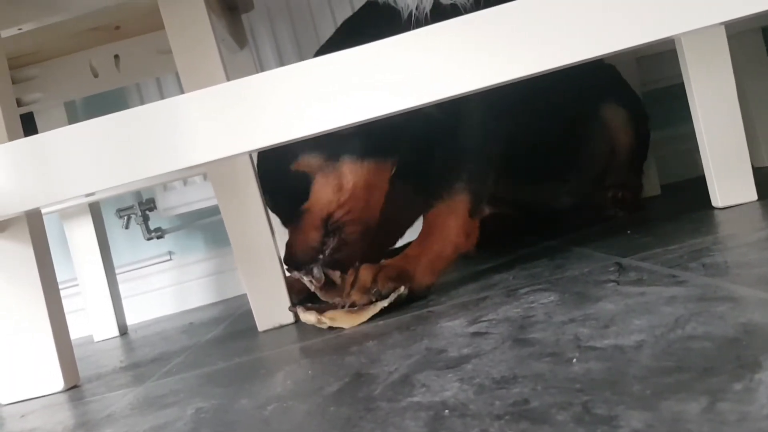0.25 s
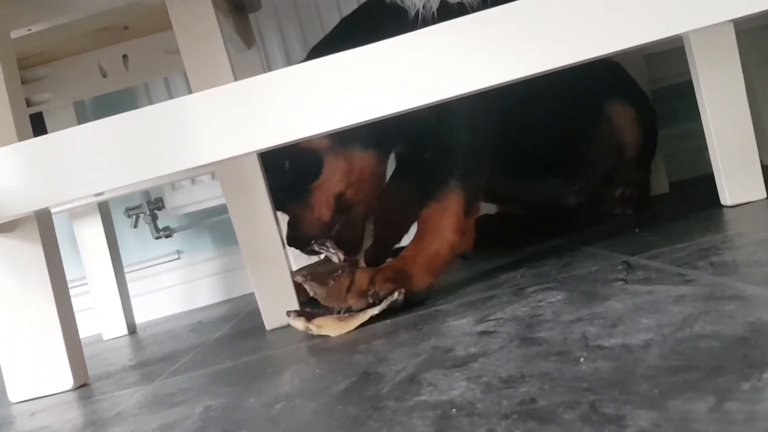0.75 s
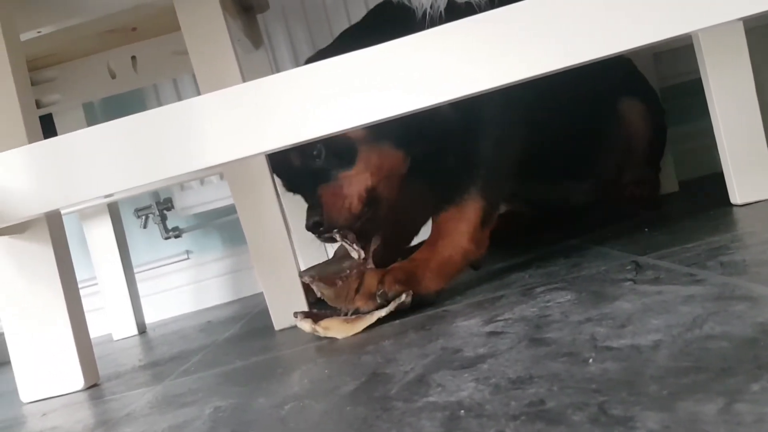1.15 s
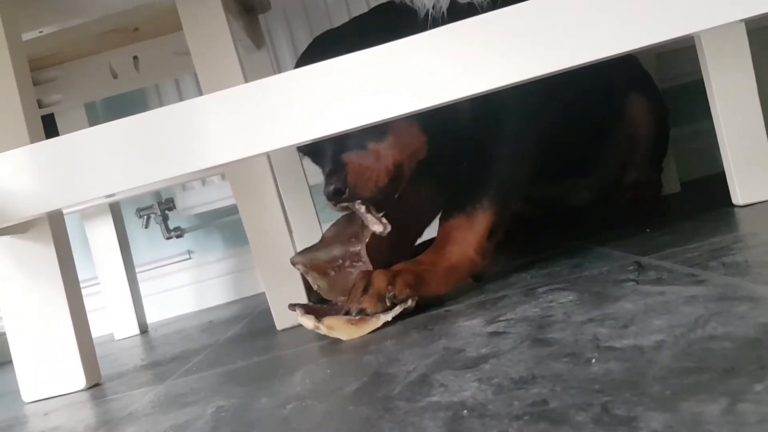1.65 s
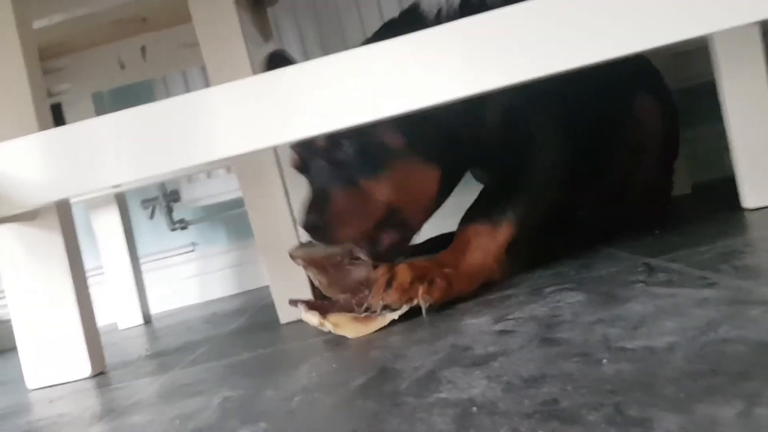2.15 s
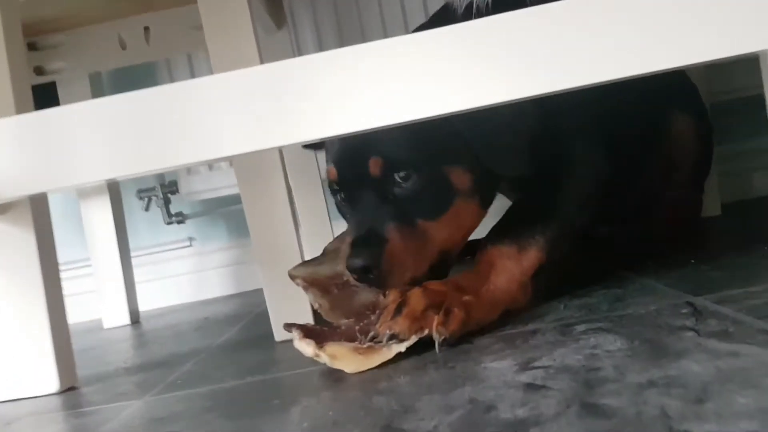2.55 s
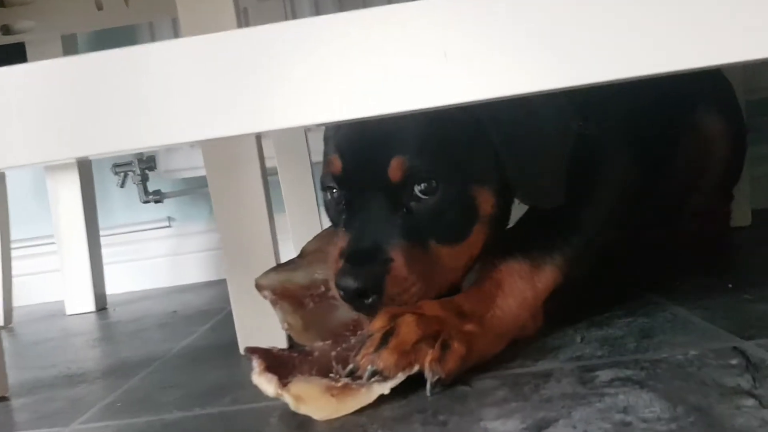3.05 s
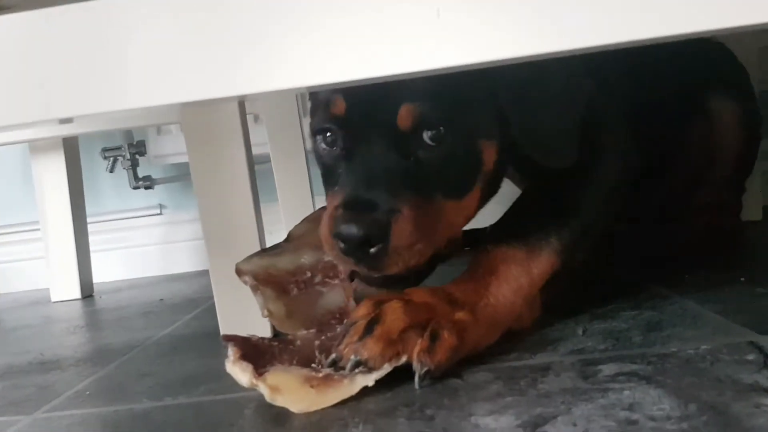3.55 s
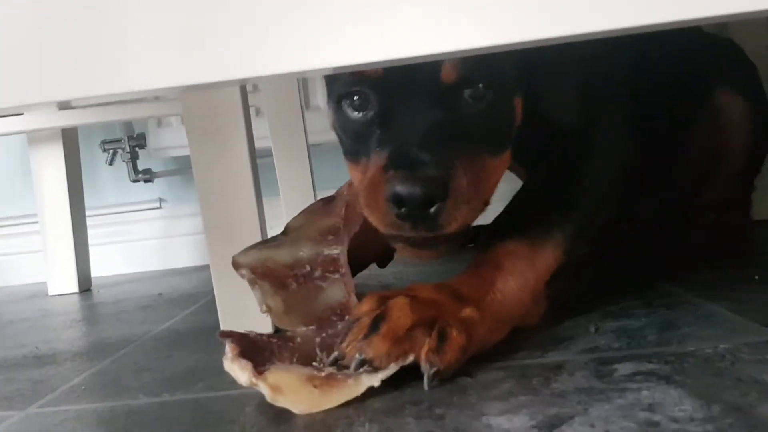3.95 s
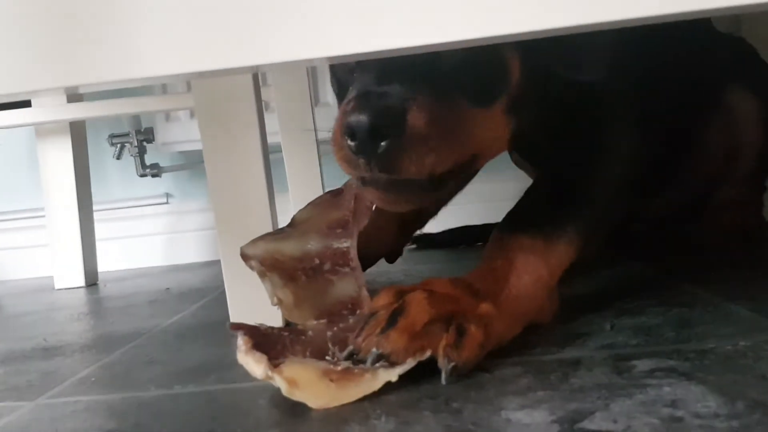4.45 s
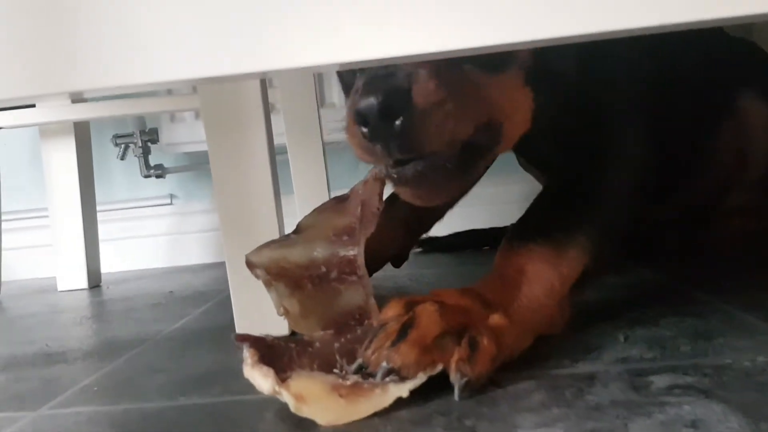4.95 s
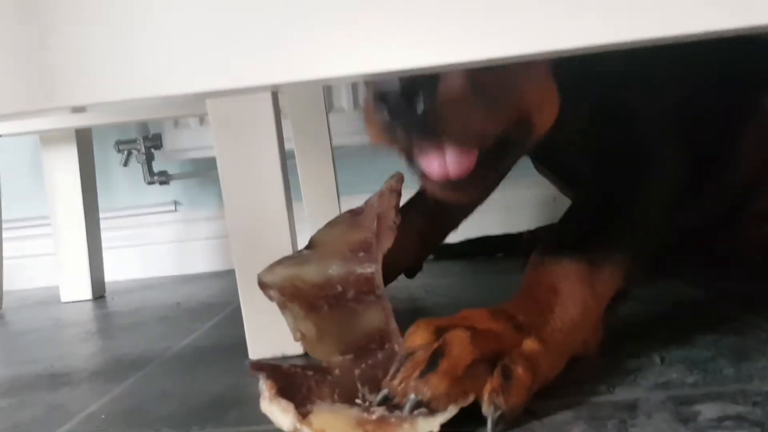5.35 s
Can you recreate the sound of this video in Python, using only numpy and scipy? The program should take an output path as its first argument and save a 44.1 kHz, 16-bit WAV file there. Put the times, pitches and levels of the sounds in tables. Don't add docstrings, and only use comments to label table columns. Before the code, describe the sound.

Close stereo handheld capture of a puppy chewing in a small tiled kitchen. Bone cracks and hollow knocks dominate the first half, with low handling bumps and thin nostril whistles around two seconds. The second half is wetter: tongue pops, tiny bright saliva snaps, breathy hissing sniffs, and a final strong smack. Quiet room hush and short reflections surround it.

```python
import sys
import numpy as np
from scipy import signal
from scipy.fft import rfft, irfft, next_fast_len
from scipy.io import wavfile
from scipy.ndimage import uniform_filter1d

SR = 44100
rng = np.random.default_rng(int(sys.argv[2]) if len(sys.argv) > 2 else 0)


def bounce(signal):
    frames = np.transpose(np.atleast_2d(signal))
    limited = np.clip(frames, -1, 1)
    pcm = np.round(limited * 32767).astype(np.int16)
    wavfile.write(sys.argv[1], SR, pcm)


def how_loud(loudness_db):
    steps = np.asarray(loudness_db, float) / 20
    return 10 ** steps


N = 247386


def band(x, hz, width):
    return signal.lfilter(*signal.iirpeak(min(hz, .45 * SR), hz / min(width, .45 * SR), SR), x)


def peaks(x, table):
    return sum((-1) ** k * how_loud(db) * band(x, hz, w) for k, (hz, w, db) in enumerate(table))


def shape(x, table):
    hz, db = np.transpose(table)
    size = next_fast_len(x.shape[-1])
    f = np.fft.rfftfreq(size, 1 / SR) + 1
    gain = how_loud(np.interp(np.log(f), np.log(hz), db))
    return irfft(rfft(x, size) * gain, size)[..., :x.shape[-1]]


def curve(table):
    s, *columns = np.transpose(table)
    return [np.interp(np.arange(N) / SR, s, c) for c in columns]


def walk(rate):
    hold = int(SR / rate)
    levels = np.repeat(rng.standard_normal(N // hold + 1), hold)
    return 1.48 * uniform_filter1d(levels, hold)[:N]


def swells(peak_s, fade_s, rise_share, *weights):
    t = np.linspace(0, N / SR, num=N // 128)
    fade_s = np.maximum(fade_s, .005) + 0 * peak_s
    late = (t - peak_s[:, None]) / fade_s[:, None]
    gate = np.exp(np.minimum(-late, late / rise_share))
    return [np.interp(np.arange(N) / SR, t, w @ gate) for w in weights]


def unit(x):
    return x / np.sqrt(np.mean(x ** 2))


def peak_at(x, db):
    return x * how_loud(db) / np.abs(x).max()


def add(out, s, x):
    i = int(s * SR)
    out[..., i:i + x.shape[-1]] += x[..., :N - i]


def aim(pan_db):
    return how_loud(np.outer([1, -1], pan_db) / 2)


def burst(length, grit_db, rise=0.0012):
    t = np.arange(4096) / SR
    grains = rng.standard_normal(4096) * how_loud(grit_db * rng.standard_normal(4096))
    return grains * np.exp(-t / max(length, .0002)) * np.minimum(t / rise, 1)


def air():
    # f/Hz, level/dB
    hush_colour = [(25, -48), (50, -9), (90, 0), (150, -14.5), (250, -14), (400, -18.5), (600, -24.5),
                   (1000, -23), (1600, -27.5), (3500, -33), (5500, -36.5), (8000, -32), (12000, -27.5),
                   (15000, -25)]
    # f/Hz, level/dB
    fridge_lines = [(97, -79.5), (689, -87.5), (1184, -86)]
    mid, side = rng.standard_normal((2, N))
    side = shape(side, [(60, 7), (200, -7), (700, 1.5), (2000, 1.0)])
    out = how_loud(-65.5) * unit(shape(mid + side * np.array([[1], [-1]]), hush_colour))
    for hz, db in fridge_lines:
        line = unit(band(rng.standard_normal(N), hz, 4 + .012 * hz))
        out = out + how_loud(db) * aim(-5) * line
    return out


def rumble():
    # t/s of the peak, level/dB
    bump_list = [(.2, -65), (.6, -56), (1.29, -59), (1.8, -43), (1.9, -44), (2.05, -53), (2.19, -37.5),
                 (2.37, -64.5), (2.73, -55), (2.95, -55), (3.08, -51.5), (3.35, -58), (3.48, -49.5),
                 (3.69, -59), (3.8, -55), (4.0, -48.5), (4.14, -54), (4.28, -61), (4.88, -61), (5.01, -53),
                 (5.12, -48), (5.28, -51), (5.42, -45), (5.6, -68)]
    # t/s of the peak, fade/s, level/dB
    shuffle_list = [(.74, 0.06, -62), (1.75, 0.15, -65), (2.17, 0.18, -61), (2.6, 0.061, -67.5),
                    (3.3, 0.26, -79), (4.4, 0.38, -77), (4.6, 0.033, -67), (5.0, 0.069, -63.5)]
    # t/s, level/dB
    hand_pan = [(0, -5), (.55, 0), (2.4, 0), (3.2, -6), (4.2, -8), (4.8, -13), (5.6, -10)]
    x = rng.standard_normal((2, N)) * how_loud(2 * walk(22.05))
    x = x[0] + .3 * x[1] * np.array([[1], [-1]])
    bumps = shape(x, [(25, -48), (48, -4.5), (72, -4.5), (100, -8.5), (160, -23.5), (400, -55)])
    scuffed = x * how_loud(2.7 * walk(45))
    shuffle = shape(scuffed, [(100, -36), (170, -2.0), (350, -2.5), (700, -9.0), (1500, -25)])
    bump_s, bump_db = np.transpose(bump_list)
    paw_s, paw_fade_s, paw_db = np.transpose(shuffle_list)
    still_hand_db, still_paws_db = -69.5, -84
    hand = swells(bump_s, 0.038, 0.63, how_loud(bump_db - 3.0))[0] + how_loud(still_hand_db)
    paws = swells(paw_s, paw_fade_s, 0.86, how_loud(paw_db))[0] + how_loud(still_paws_db)
    return unit(bumps) * hand * aim(curve(hand_pan)[0]) + unit(shuffle) * paws * aim(-4)


def whistles():
    # level/dB, its pitch as (t/s, f/Hz) points
    whistle_list = [
        (-77, [(1.995, 10850), (2.03, 11300), (2.052, 12000), (2.085, 11720), (2.13, 11900), (2.15, 11800), (2.225, 11200)]),
        (-76, [(2.225, 11200), (2.25, 11400), (2.29, 11500), (2.335, 11900), (2.37, 12000), (2.435, 10600)]),
        (-74.5, [(2.083, 10500), (2.11, 10620), (2.155, 10480), (2.195, 10100)]),
        (-76, [(2.243, 10000), (2.34, 10000)]),
    ]
    out, t = 0, np.arange(N) / SR
    for db, pitch in whistle_list:
        on = uniform_filter1d(1. * (t > pitch[0][0]) * (t < pitch[-1][0]), size=900)
        level = how_loud(db + 5 + 2 * walk(60))
        hz = curve(pitch)[0] + 20 * walk(90)
        out = out + on * level * np.sin(2 * np.pi * np.cumsum(hz) / SR)
    return out


def puffs():
    # t/s, length/s, f/Hz, width/Hz, level/dB
    puff_list = [(0.735, 0.26, 4100, 450, -71.5), (1.266, 0.076, 4400, 1400, -76.5),
                 (1.269, .06, 6470, 900, -79), (1.508, 0.28, 6800, 300, -83),
                 (3.294, 0.072, 2600, 300, -68), (3.296, .1, 1600, 300, -69),
                 (4.089, 0.049, 1880, 404, -67), (4.83, 0.17, 2150, 250, -70)]
    out, flutter = np.zeros(N), how_loud(2 * walk(46))
    t = np.arange(SR // 3) / SR
    for s, length, hz, width, db in puff_list:
        x = unit(band(band(rng.standard_normal(len(t)), hz, width), hz, width))
        add(out, s, how_loud(db) * x * np.sin(np.pi * np.clip(t / length, 0, 1) ** 0.43))
    return out * flutter


def nose():
    # t/s of the peak, fade/s, hiss level/dB, centre f/Hz,
    # wet top hiss level/dB
    sniff_list = [(0.02, .06, -76, 5930, -67), (.46, 0.12, -68.5, 4400, -65), (.553, 0.03, -80, 3990, -39),
                  (.72, 0.064, -63.5, 3230, -73), (1.66, 0.041, -73, 5630, -68),
                  (1.84, .05, -73, 3410, -90), (1.98, .05, -84, 5900, -64.5), (2.15, 0.11, -64, 4900, -55),
                  (2.39, 0.065, -71, 4500, -65.5), (2.58, 0.023, -73, 5300, -71),
                  (2.86, 0.038, -70, 3460, -76), (2.99, 0.067, -67.5, 4300, -61),
                  (3.29, 0.037, -85, 3930, -77), (3.51, 0.34, -78, 5540, -64.5),
                  (4.12, 0.028, -87, 5000, -58), (4.27, 0.12, -66, 3880, -57),
                  (4.66, 0.16, -74.5, 5500, -64), (4.78, 0.06, -75, 6080, -55),
                  (5.12, 0.082, -54.5, 5070, -57.5), (5.3, 0.16, -62.5, 5640, -63),
                  (5.42, 0.19, -61.5, 3260, -55.5)]
    quiet_nose_db, quiet_wet_db = -84.5, -81.5
    s, fade, hiss_db, centre_hz, wet_db = np.transpose(sniff_list)
    weights = how_loud(hiss_db), how_loud(hiss_db) * centre_hz, how_loud(wet_db)
    flow, pitch, damp = swells(s, fade, 0.57, *weights)
    centre, hiss = pitch / flow, 0
    for hz in (1800, 2840, 3350, 4400, 5720, 6800, 6800):
        near = np.exp(-(np.log(hz / centre) / 0.22) ** 2)
        breath = unit(band(rng.standard_normal(N), hz, 0.77 * hz))
        hiss = hiss + (1.05 + near) * how_loud(2 * walk(27)) * breath
    spray = rng.standard_normal(N) * how_loud(1.4 * rng.standard_normal(N))
    wet = unit(band(band(spray, 13800, 7400), 14500, 10000))
    dry_part = (flow + how_loud(quiet_nose_db)) * how_loud(-14.5) * hiss
    return dry_part + (damp + how_loud(quiet_wet_db)) * how_loud(-10.5 + 2 * walk(30)) * wet


def snaps():
    # t/s, level/dB, centre f/Hz
    snap_list = [(0.3594, -60, 12300), (1.9622, -44.5, 7200), (2.1334, -38, 10100), (2.535, -48, 10800),
                 (4.271, -43, 12000), (4.4574, -36, 11000), (4.635, -39.5, 12900), (4.7203, -29, 12800),
                 (4.7426, -31, 13500), (4.782, -31.5, 13000), (4.8, -35, 9950), (4.819, -37, 9500),
                 (4.894, -37, 8850), (4.906, -42, 15000)]
    out = np.zeros(N)
    for s, db, hz in snap_list:
        click = burst(0.0017, 2.7, rise=0.001)
        add(out, s, peak_at(band(band(click, hz, .5 * hz), hz, .7 * hz), db - 5.5))
    return out


def ticks():
    # t/s, level/dB, centre f/Hz,
    # width as a share of the centre, fizz/s
    tick_list = [(0.4793, -60, 5000, 0.54, 0.012), (0.5199, -45.5, 3980, 0.97, 0.012),
                 (0.549, -36, 4200, .8, 0.005), (0.5543, -29, 4300, 0.55, 0.002),
                 (0.5595, -29, 2500, 0.6, 0.004), (0.5612, -35, 4400, 0.4, 0.0015),
                 (0.857, -57.5, 6900, 0.4, 0.008), (1.759, -51, 3030, 0.43, 0.008),
                 (2.2207, -47, 2720, 0.59, 0.0026), (2.36, -56.5, 5430, 0.5, 0.0047),
                 (2.501, -56, 6500, 0.42, 0.0069), (2.8175, -50.5, 3250, 0.45, 0.01),
                 (2.8432, -54, 3350, 0.32, 0.0047), (2.9856, -55.5, 11000, 0.9, 0.0048),
                 (3.3005, -63, 4000, 0.38, 0.014), (3.3191, -56.5, 2650, 0.53, 0.0022),
                 (4.0583, -52, 4160, 0.5, 0.0048), (4.2532, -56, 3500, 0.25, 0.006),
                 (4.272, -49, 3830, 1, 0.004), (4.7996, -37, 8500, 0.84, 0.0098),
                 (4.7198, -57, 5900, .3, .006), (4.803, -47, 6200, .5, .003),
                 (4.817, -44, 11200, 0.9, 0.0025), (4.819, -47, 4600, .6, .01),
                 (4.832, -51, 5400, .2, .004), (5.247, -59, 3000, .15, .01),
                 (5.2396, -51.5, 11000, 0.65, 0.0059), (5.252, -45.5, 6100, 1, 0.0075),
                 (5.3997, -40, 10600, 0.71, 0.0052),
                 (3.045, -51, 1300, 0.95, 0.015), (2.819, -59, 1150, 0.48, 0.016),
                  (.563, -36, 2240, 0.8, 0.011), (3.315, -57, 940, 0.24, 0.03), (.578, -43, 2500, .8, 0.03),
                  (.558, -39, 1200, .9, .03), (2.224, -53, 1350, .35, .014), (4.244, -58, 860, .22, .016),
                  (5.474, -37, 1900, 1.1, .003), (5.474, -38, 750, .7, .003), (2.567, -54, 900, .9, 0.033),
                  (2.368, -52, 680, 0.59, 0.021), (5.476, -39, 3100, .25, .005),
                  (2.501, -54, 4000, .25, .003)]
    # f/Hz, width/Hz, level/dB
    splinter_peaks = [(6030, 2300, 12.5), (10820, 6100, 20)]
    out = np.zeros((2, N))
    for s, db, hz, share, fizz in tick_list:
        x, width = burst(fizz, 0.82, rise=0.00061), hz * np.clip(share, .08, 1.2)
        steep = band(band(x, hz, width), hz, width)
        splinter = (width / 14000) ** 2 * peaks(x, splinter_peaks)
        add(out, s, peak_at(steep + splinter, db + 4.0) * aim(-5))
    return out


def smacks():
    # t/s, level/dB, mouth resonance f/Hz, cycles to fade, upper resonances level/dB
    smack_list = [(2.205, -54, 1040, 4, -27), (2.818, -59, 1160, 6.1, -27), (3.321, -56.5, 904, 8.3, -26),
                  (3.344, -46.5, 885, 4.5, -27), (3.364, -53.5, 760, 3.5, -24), (3.533, -50, 855, 9.5, -18),
                  (3.706, -68.5, 796, 7.9, -13), (3.818, -69.5, 586, 7.7, -29),
                  (3.926, -65.5, 815, 8.7, -10), (4.091, -61, 802, 7.8, -13), (4.12, -59, 785, 2.6, -9.5),
                  (4.245, -64, 852, 9, -12), (4.273, -48, 1072, 9.4, -7.5), (4.421, -42, 887, 9.3, -16),
                  (4.444, -50.5, 880, 4.6, -26), (4.467, -52.5, 920, 2.9, -24),
                  (4.587, -55.5, 1043, 9.1, -27), (4.629, -65, 1050, 3.5, 1.5),
                  (4.75, -47, 1043, 12.6, -12), (4.799, -53.5, 1040, 6.6, -29),
                  (4.821, -34, 1244, 2.7, -16), (4.896, -41.5, 846, 6.1, -26), (5.4, -55, 1240, 4, -5),
                  (5.475, -22, 1370, 5.6, -18)]
    cheek_list = [(4.751, -45, 1450, 5.5, -30), (5.476, -36, 3660, 14, -25), (5.4755, -39, 2250, 4, -32),
                  (4.273, -56, 1400, 4, -30)]
    # f/Hz, width/Hz, level/dB
    upper_peaks = [(1600, 190, 4.5), (2150, 520, 2.5), (2600, 390, 6), (3500, 4100, -5)]
    out, t = np.zeros((2, N)), np.arange(2048) / SR
    mouth_gains = aim(-1.7)
    for s, db, hz, cycles, upper_db in smack_list + cheek_list:
        phase = hz * (t - .3 * .0012 * (1 - np.exp(-t / .0012)))
        swell = (1 - np.exp(-phase / .5)) ** 2
        pop = np.sin(2 * np.pi * phase) * swell * np.exp(-(phase / max(cycles, .5)) ** 2.2)
        add(out, s - .001, peak_at(pop, db + 3.0) * mouth_gains)
        spit = peaks(peaks(burst(0.0042, 1.0, rise=0.00032), upper_peaks), upper_peaks)
        add(out, s, peak_at(spit, db + upper_db + 6.5) * mouth_gains)
    return out


def knocks():
    # t/s, knock level/dB, struck part rings near f/Hz, thud and crack level/dB re knock
    knock_list = [(0.549, -34.5, 900, -5, -0.5), (0.584, -38.5, 450, -7.5, -30),
                  (0.609, -38.5, 331, -7, -33), (1.716, -62, 331, 6, -19), (1.74, -56, 300, 6, -30),
                  (1.76, -32.5, 600, -5, -18), (1.772, -33.5, 570, -7, -30), (1.81, -41, 700, -9, -44),
                  (2.114, -59, 307, 7, -12), (2.133, -51.5, 314, 8, -27), (2.15, -49, 420, 3, -28),
                  (2.172, -43.5, 330, 0, -19), (2.207, -40, 1000, -22, -37), (2.335, -58, 400, -5, -25),
                  (2.357, -48, 400, -9, -13), (2.388, -50, 428, -8.5, -18), (2.565, -55.5, 500, -7.5, -34),
                  (3.044, -54.5, 338, -10, -8), (3.066, -52, 950, -4.5, -50), (3.191, -62, 745, -15.5, -25),
                  (4.943, -57.5, 776, -7.5, -19), (5.32, -59, 484, 3, -7), (5.34, -57, 590, -8, -7)]
    # f/Hz, level/dB, time to fall 60 dB/s
    floor_modes = [(73, 1, 0.32), (104, -48, 0.11), (176.8, 0.5, 0.187), (210, 3, 0.12), (252, 2, 0.11)]
    bone_modes = [(346, -0.5, 0.062), (414, -4, 0.06), (532, -1, 0.023), (591, 0.5, 0.038), (700, -3, 0.12),
                  (834, 3, 0.02), (1047, -0.5, 0.037), (1248, 0.5, 0.045), (1450, 1, 0.0094)]
    # f/Hz, width/Hz, level/dB
    crack_peaks = [(1560, 400, 1.5), (2250, 340, -1.5), (2800, 370, -1)]
    out, t = np.zeros(N), np.arange(12000) / SR
    for s, db, struck_hz, thud_db, crack_db in knock_list:
        rattle = 0.01 * 2 ** ((-29 - db) / 34)
        hit = np.pad(burst(rattle, 2.8, rise=0.27 * rattle), (0, 4000))
        for modes, rel_db, slope_db in ((floor_modes, thud_db, 0), (bone_modes, 0, 15)):
            grip = rng.standard_normal(len(modes))
            ring = 0
            for (f, g, t60), bend in zip(modes, grip):
                level = how_loud(g - slope_db * abs(np.log2(f / struck_hz)))
                tone = np.sin(2 * np.pi * f * (1 + 0.017 * bend) * t)
                ring = ring + level * tone * 1000 ** (-t / t60)
            add(out, s, peak_at(signal.fftconvolve(hit, ring), db + rel_db + 4.5))
        crunch = band(band(hit, struck_hz, 2.0 * struck_hz), struck_hz, 2.9 * struck_hz)
        crack = peaks(peaks(hit, crack_peaks), [(2600, 4500, 0)])
        add(out, s, peak_at(crunch, db - 8.0) + peak_at(crack, db + crack_db + 12.0))
    return out


def room(x):
    # f/Hz, time to fall 60 dB/s, level/dB
    room_bands = [(82, 0.68, -10), (200, 0.37, -3), (520, 0.39, -6), (1090, 0.25, -19.5),
                  (2300, 0.46, -6.5), (3400, 0.36, -17), (5640, 0.22, -7.5), (11000, 0.12, 0.5)]
    t = np.arange(SR * 3 // 4) / SR
    mid, side = rng.standard_normal((2, len(t)))
    onset = np.clip((t - .005) / .016, 0, 1)
    echo = 0
    for hz, t60, db in room_bands:
        noise = mid + min(hz / 1200, 1) * side * np.array([[1], [-1]])
        tail = band(noise, hz, 1.34 * hz) * 1000 ** (-t / t60) * onset
        echo = echo + how_loud(db) * tail / np.sqrt(t60 * SR / 14)
    return signal.fftconvolve(x, echo, axes=1)[:, :N]


def scene():
    # t/s, level/dB
    muzzle_pan = [(0, 2), (.6, 0), (1.8, 0), (2.3, -1), (3.3, 0), (4.4, 0), (4.8, 5), (5.2, -2), (5.5, 2)]
    # f/Hz, level/dB
    left_shade = [(80, -1.5), (300, -2), (1000, -4), (4000, -5), (11000, 2.5)]
    muzzle = aim(curve(muzzle_pan)[0])
    mouth = smacks() + nose() + puffs() + ticks()
    loud = knocks() * aim(-.8) + mouth * muzzle
    fine = snaps()
    wet = room(loud + how_loud(-5) * fine) * aim(0.5)
    late_right = np.roll(loud[1] + fine * how_loud(-1.5), 8)
    left = shape(loud[0] + fine + wet[0], [(hz, db / 2) for hz, db in left_shade])
    right = shape(late_right + wet[1], [(hz, -db / 2) for hz, db in left_shade])
    return np.array([left, right]) + whistles() + rumble() + air()


def roll_off(x):
    return signal.sosfilt(signal.butter(12, 15390, fs=SR, output="sos"), x)


def record(dry):
    # f/Hz, level/dB
    treble_notch = [(7300, 0), (8100, -5), (8450, -15), (8900, -6), (9900, 0)]
    x = shape(dry, treble_notch)
    x = signal.sosfilt(signal.ellip(8, .2, 31, 14450, fs=SR, output="sos"), x)
    x = signal.sosfilt(signal.butter(2, 45, "high", fs=SR, output="sos"), x)
    return roll_off(x)


dry = scene()
out = record(dry)
bounce(out)
```